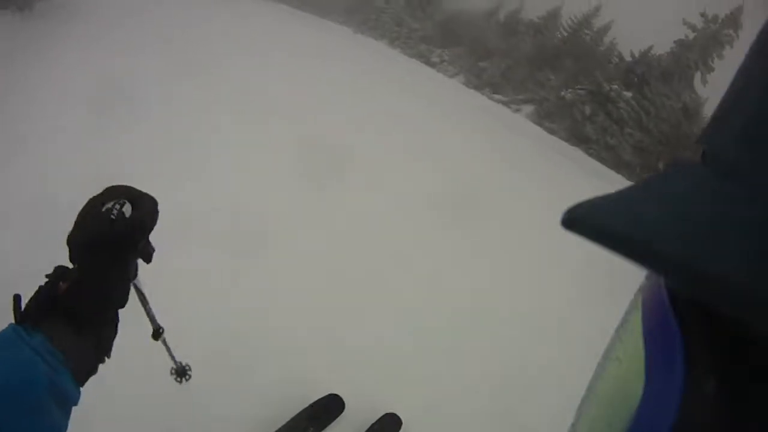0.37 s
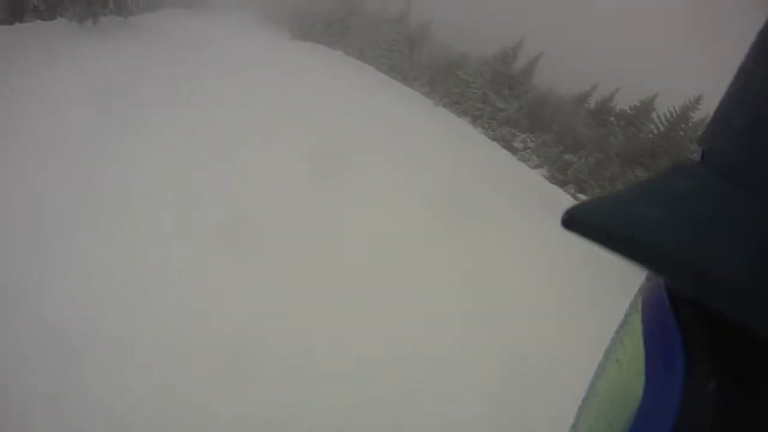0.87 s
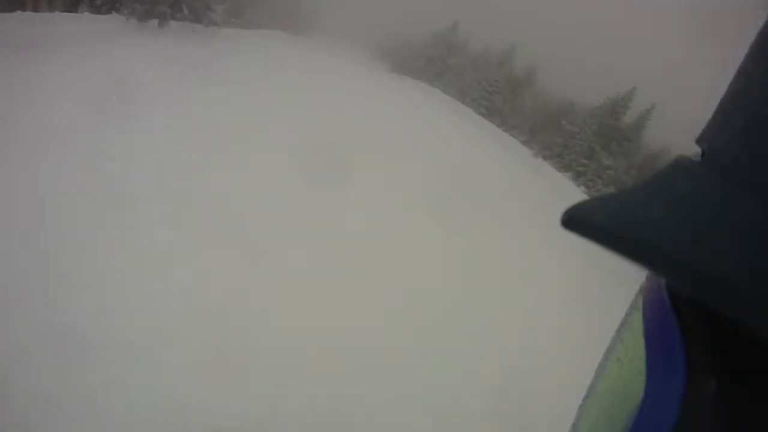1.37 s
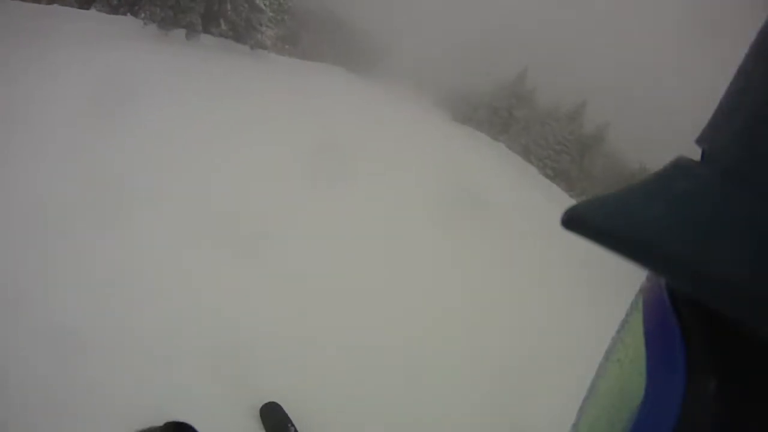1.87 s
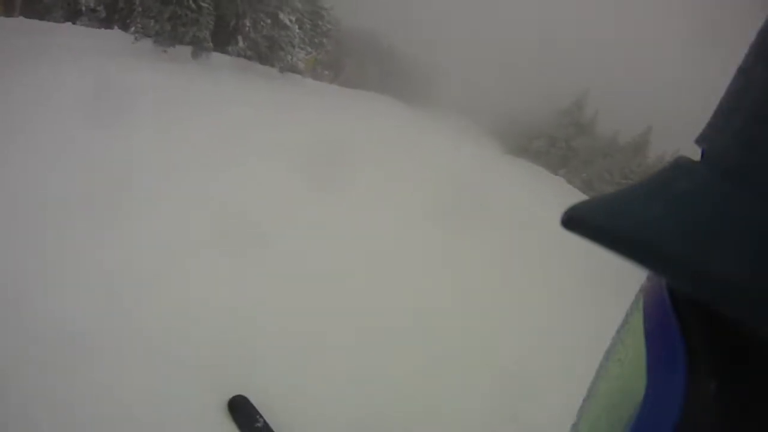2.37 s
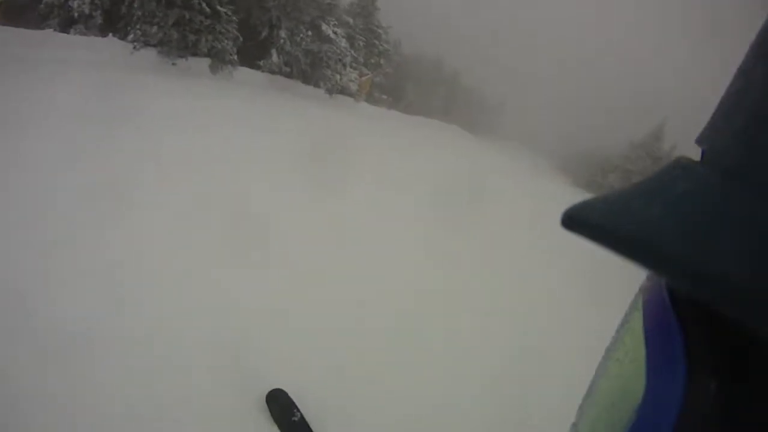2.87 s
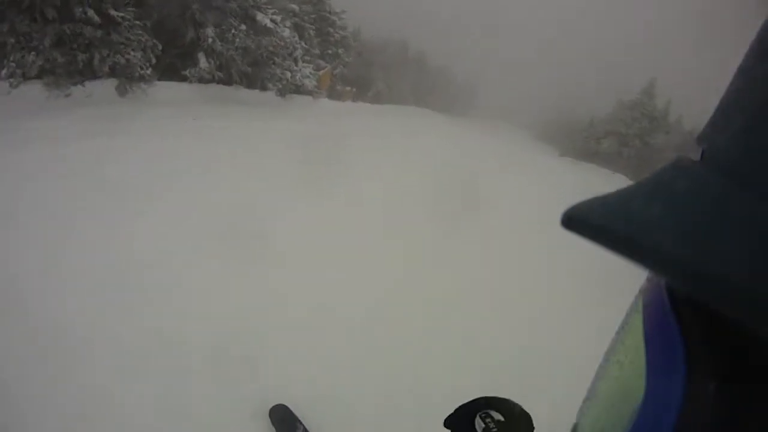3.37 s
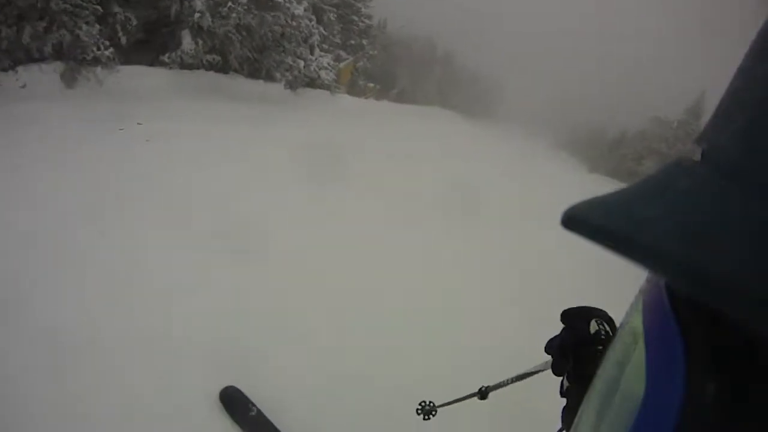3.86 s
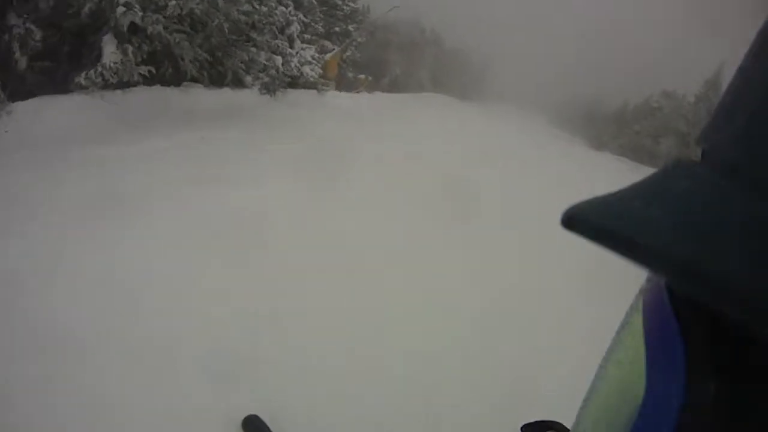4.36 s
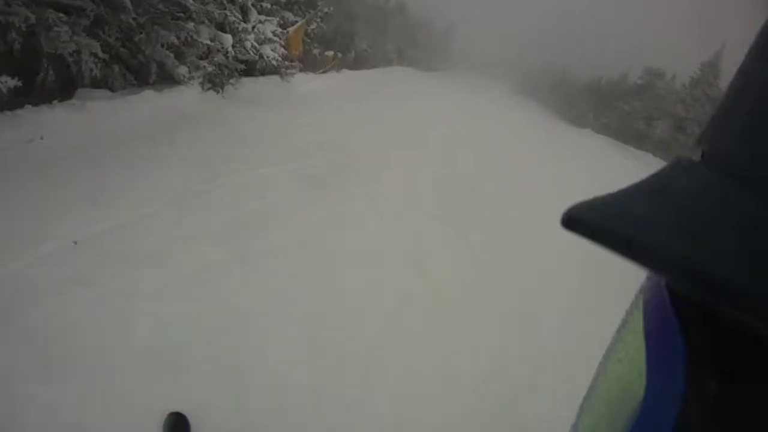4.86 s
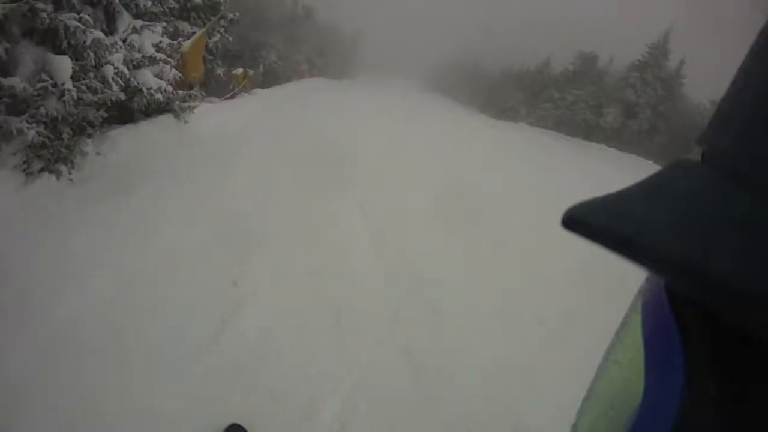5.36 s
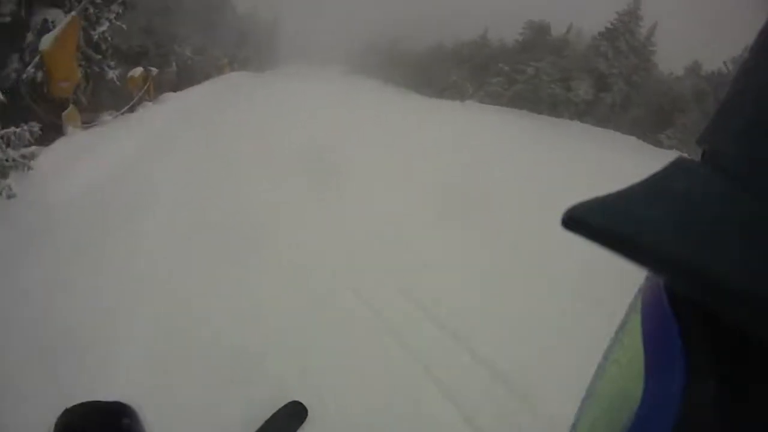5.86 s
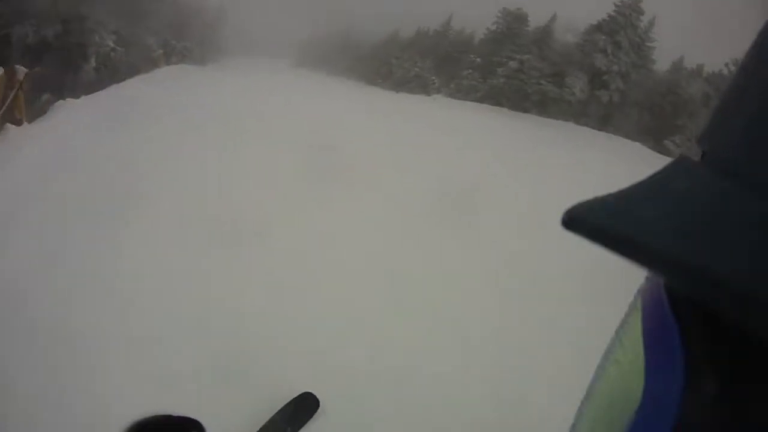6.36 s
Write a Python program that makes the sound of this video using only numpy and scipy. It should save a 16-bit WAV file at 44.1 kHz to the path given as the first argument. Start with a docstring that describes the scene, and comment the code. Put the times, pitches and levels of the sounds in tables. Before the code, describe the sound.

Close and muffled on an open snowy slope: low wind rumble and sliding skis start moderate and sink to a faint hush. A swish rises, snow crunches briefly with a tiny edge squeal, and wind flutters now and then. Another swish swells and fades, light icy ticks gather, then dense crunching leads into strong scraping, powder hiss and windy thuds. Brief dropouts pop occasionally.

```python
"""Skis slide over soft snow, heard by a helmet microphone in a sealed case: shaped noise swishes, scrapes and sprays,
while decaying noise bursts make the crunches and ticks, and a narrow noise band the squeal of an edge.
Head wind buffets the microphone: low noise with random swells thuds and flutters, rising in gusts.
At listed moments the sound cuts out for some milliseconds, with a downward pop at each end."""
import sys
import numpy as np
from scipy import signal
from scipy.fft import rfft, irfft, next_fast_len
from scipy.io import wavfile
from scipy.ndimage import uniform_filter1d, map_coordinates

SR = 44100
rng = np.random.default_rng(int(sys.argv[2]) if len(sys.argv) > 2 else 0)


def attenuation_scalar(level_db):
    """Turn a level in dB into a linear amplitude multiplier (20 dB per decade)."""
    decades = np.asarray(level_db, float) / 20
    return 10 ** decades


def put_to_file(sound):
    """Save the sound as 16-bit audio at rate SR, in the file named by the first command-line argument."""
    columns = np.atleast_2d(sound).T  # one column per channel
    safe = np.clip(columns, -1, 1)
    whole_steps = np.round(safe * 32767)
    wavfile.write(sys.argv[1], SR, whole_steps.astype(np.int16))


N = 285768

# Head wind, its strength given as the level of the deep buffet outside gusts: time_s, buffet_db
WIND_STRENGTH = [(0, -39.5), (.35, -50), (.58, -52.5), (.82, -53.5), (.89, -65), (.96, -57), (1.3, -69.5),
                 (1.78, -62.5), (2.1, -70), (2.6, -74), (2.92, -53.5), (3.3, -54.5), (3.7, -56.5),
                 (4.3, -71), (4.6, -63), (5.3, -60.5), (5.75, -51), (6.15, -49), (6.48, -44)]
# Gusts on the microphone port: start_s, length_s, flutter_db, buffet_over_flutter_db
PORT_GUSTS = [(0.612, 0.069, -37, -31), (1.036, 0.2, -51.5, 3.5), (2.97, .05, -50, -5),
              (3.441, 0.071, -43, 6.5), (3.58, 0.1, -52, -3), (4.54, 0.049, -55.5, -5),
              (5.363, 0.065, -59, -15), (5.698, 0.046, -37.5, -11), (5.891, 0.14, -34, -7.5),
              (6.235, 0.11, -29.5, -16)]
# Relative spectra of the wind's large and small eddies: frequency_hz, density_db_per_hz
BUFFET_SPECTRUM = [(12, -44.5), (25, -14), (45, -7.5), (75, -7), (120, -10), (400, -73), (4000, -120)]
FLUTTER_SPECTRUM = [(30, -57.5), (80, -7.5), (130, 0), (210, 0), (350, -9.5), (700, -19), (4000, -120)]
# Edge pressure through the turns, before bites: time_s, scrape_db, slide_over_scrape_db
EDGE_PRESSURE = [(0, -48, 5.5), (.3, -49.5, 4.5), (.6, -60, 6), (.74, -71.5, 4.5), (1.19, -61, 6.5),
                 (1.35, -68.5, 6.5), (1.64, -56.5, 7.5), (2, -53.5, 9.5), (2.29, -56.5, 16),
                 (2.42, -58.5, 15), (2.67, -53.5, 9), (3.05, -51.5, 4.5), (3.4, -53, 7.5), (3.88, -45, 4.5),
                 (4.15, -52.5, 9.5), (4.24, -57, 4), (4.52, -58.5, 4.5), (4.9, -54.5, 6), (5.31, -52, 9.5),
                 (5.52, -46, 10.5), (5.72, -38.5, 6.5), (5.97, -34.5, 5.5), (6.14, -44, 10),
                 (6.32, -39.5, 6.5), (6.48, -40, 2.5)]
# Edges biting into harder snow for a moment: start_s, length_s, scrape_gain_db
EDGE_BITES = [(2.46, 0.11, 8.5), (2.874, 0.012, 13), (2.924, 0.011, 7), (2.97, 0.04, 4), (3.483, 0.15, 3.5),
              (4.56, .025, 10.5), (4.613, 0.059, 5), (5.333, 0.036, 9), (5.375, 0.041, 15),
              (5.423, 0.061, 6), (5.633, 0.036, 1.5), (5.907, 0.012, 1.5), (5.99, 0.018, 5)]
# Powder spray at a light scrape: time_s, spray_db
LIGHT_SPRAY = [(0, -69), (.8, -71.5), (2.3, -67.5), (2.8, -67), (4, -68.5), (4.6, -66), (5.2, -65.5),
               (5.5, -67), (5.8, -67.5), (6.48, -68.5)]
# Relative spectra of bases, edges and powder: frequency_hz, density_db_per_hz
SLIDE_SPECTRUM = [(60, -52.5), (150, -12.5), (300, 0), (450, 0), (700, -2), (1000, -8), (1600, -23.5),
                  (4000, -120)]
SCRAPE_SPECTRUM = [(500, -38), (900, -2.5), (1300, -1.5), (1900, -4), (2300, -10), (3000, -26.5),
                   (3600, -41), (6000, -120)]
SPRAY_SPECTRUM = [(2000, -1), (3200, 0.1), (4300, -0.6), (5400, -0.6), (6000, -7.5), (7000, -6.5),
                  (9200, -2.5), (11500, -8), (13000, -19.1), (15000, -21), (17000, -83)]
# Moments when the sound cuts out: start_s, length_ms, pop_in_db, pop_out_db (scales of the pop shapes)
SOUND_CUTS = [(.0587, 2.1, -27, -40), (.6301, 4.8, -26, -24), (.6675, 5.2, -26, -29),
              (.6761, 4.9, -30, -25), (.9605, 3.1, -44, -55), (.9833, 11, -40, -37),
              (3.4692, 21.9, -32, -25), (3.5212, 9.3, -55, -50), (3.6133, 19.9, -27, -28),
              (4.814, 14, -43, -38), (6.2525, 4, -25, -24), (6.2612, 1.8, -40, -21), (6.277, 4.5, -23, -26)]
# Crusts breaking under the skis: start_s, knock_peak_db, pitch_hz, crackle_over_knock_db
CRUST_BREAKS = [(0.06, -26.5, 710, -15), (0.223, -35, 535, -7.5), (0.788, -38.5, 630, -26),
                (0.929, -42, 450, -20), (0.98, -43, 480, -7), (1.055, -41, 506, -20),
                (1.324, -40.5, 430, -19), (1.543, -43.5, 676, -23), (1.578, -42.5, 680, -22),
                (2.044, -41, 810, -22), (2.266, -44.5, 450, -24), (2.381, -39.5, 430, -3),
                (2.43, -25.5, 700, -12.5), (2.482, -30.5, 604, -25), (2.854, -42, 704, -12),
                (2.882, -35, 860, -6), (2.931, -34, 465, -18), (3.394, -41, 764, -19),
                (4.629, -33, 774, -12), (4.64, -32, 685, -0.5), (4.836, -35, 504, -12),
                (4.965, -38, 690, -9), (5.193, -33, 445, -20), (5.339, -29, 590, -17),
                (5.398, -18, 430, -22), (5.434, -21, 506, -16), (5.495, -23.5, 780, -18),
                (5.592, -24, 544, -13), (5.65, -19.5, 500, -10), (5.721, -28, 495, -4),
                (5.748, -21.5, 606, -7.5), (5.836, -23, 690, -10), (5.915, -20.5, 720, -9.5),
                (6.398, -30, 720, -8)]
# Ice and buckle ticks: start_s, level_db, pitch_hz
HARD_TICKS = [(0.448, -59, 6400), (.53, -60, 5100), (.862, -62, 2550), (.93, -67, 3600), (0.98, -60, 3100),
              (2.353, -57, 4700), (2.885, -50, 4100), (2.906, -46, 2950), (4.642, -61, 3200),
              (4.804, -52, 4400), (4.904, -53, 9100), (4.964, -52, 6100), (5.036, -47, 10300),
              (5.064, -53, 9100), (5.125, -47, 8100), (5.26, -54, 7400), (5.292, -57, 3800),
              (5.381, -55, 7700), (5.397, -41, 4400), (5.549, -47, 3800), (5.568, -39, 3700),
              (4.868, -47, 2700), (5.085, -54, 5500), (5.651, -37, 3300), (5.653, -42, 9300),
              (5.727, -39, 10600), (6.152, -43, 5500)]
# Ticks that ring on with a pitch: start_s, level_db, pitch_hz
RINGING_TICKS = [(5.657, -45, 8050)]
# An edge squeals, one row (level before its unsteadiness): start_s, length_s, level_db
EDGE_SQUEAL = (2.478, .095, -69)
# Relative spectrum of the squeal: frequency_hz, density_db_per_hz
SQUEAL_SPECTRUM = [(3500, -56), (4700, -14), (5150, -4), (5500, -8), (6500, -62)]

BITE_RISE_S, BITE_FALL_S = 0.0084, 0.01  # the fall is a time constant


def unit(x):
    """Normalisation: equal mean power, rms 1."""
    return x / np.sqrt(np.mean(x ** 2) + 1e-20)


def curves(rows):
    """Linear interpolation: one value per sample for each column after the time."""
    times, *columns = np.transpose(rows)
    return [np.interp(np.arange(N) / SR, times, column) for column in columns]


def wobble(rate_hz):
    """Slow random modulation: a smooth curve through rate_hz random knots a second."""
    knots = rng.standard_normal(400 * 7)
    return map_coordinates(knots, [np.arange(N) * rate_hz / SR])


def coloured(x, spectrum):
    """Minimum-phase filtering: a folded cepstrum makes the spectrum's filter causal; rms 1."""
    m = 2 * next_fast_len(N // 2 + 4096)
    hz, db = np.transpose(spectrum)
    log_hz = np.log(np.fft.rfftfreq(m, 1 / SR) + 1)
    magnitude = attenuation_scalar(np.interp(log_hz, np.log(hz), db))
    cepstrum = irfft(np.log(magnitude), m)
    cepstrum[1:m // 2] *= 2
    cepstrum[m // 2 + 1:] = 0
    response = np.exp(rfft(cepstrum))
    return unit(irfft(rfft(x, m) * response, m)[:N])


def patchy(spread_db):
    """Non-stationary noise: white noise with random gains in patches of time and frequency."""
    cells = signal.stft(rng.standard_normal(N), nperseg=512)[2]
    field = uniform_filter1d(rng.standard_normal(cells.shape), size=5, axis=0)
    field = uniform_filter1d(field, size=7, axis=1)
    return unit(signal.istft(cells * attenuation_scalar(spread_db * unit(field)), nperseg=512)[1][:N])


def held(start_s, length_s, rise_s, fall_s):
    """Forcing and relaxation: a squared rise to 1, a hold until length_s, an exponential fall."""
    t = np.arange(N) / SR - start_s
    rise = np.clip(t / rise_s, 0, 1) ** 2
    return rise * np.exp(-np.clip(t - length_s, 0, None) / fall_s)


def wind():
    """Turbulent pressure: eddies reach the port in lumps, large slow ones thud, small quick ones flutter."""
    calm_db, flutter_over_buffet_db = -52.5, 0.5  # at the calm strength
    flutter_growth = 0.7  # dB of flutter per dB of wind
    buffet_db, = curves(WIND_STRENGTH)
    flutter_db = calm_db + flutter_over_buffet_db + flutter_growth * (buffet_db - calm_db)
    buffet_gain, flutter_gain = attenuation_scalar(buffet_db), attenuation_scalar(flutter_db)
    for start_s, length_s, gust_db, deep_db in PORT_GUSTS:
        gust = held(start_s, length_s, rise_s=0.01, fall_s=0.025)
        buffet_gain += gust * attenuation_scalar(gust_db + deep_db)
        flutter_gain += gust * attenuation_scalar(gust_db)
    lumps = 1.6 * wobble(22)  # shared by both eddy sizes
    buffet = coloured(patchy(spread_db=1.1), BUFFET_SPECTRUM) * attenuation_scalar(lumps)
    flutter = coloured(patchy(spread_db=1.5), FLUTTER_SPECTRUM) * attenuation_scalar(1.4 * lumps + 0.35 * wobble(45))
    return buffet_gain * unit(buffet) + flutter_gain * unit(flutter)


def grains(per_second, spread_db):
    """Shot noise: snow crystals snap at random moments with exponentially spread extra level."""
    snaps = rng.random(N) < per_second / SR
    sizes = attenuation_scalar(spread_db * rng.exponential(1, N))
    return unit(snaps * rng.standard_normal(N) * sizes)


def glide():
    """Friction noise: bases slide, edges scrape, powder sprays; bumps in the snow shake all three together."""
    slide_share, spray_share = 0.63, 0.34  # shares of a bite's dB gain
    light_db, spray_growth = -53.5, 0.71  # a light scrape; dB of spray per dB of pressure
    pressure_db, slide_over_db = curves(EDGE_PRESSURE)
    light_spray_db, = curves(LIGHT_SPRAY)
    bite_db = sum(db * held(s, length, BITE_RISE_S, BITE_FALL_S) for s, length, db in EDGE_BITES)
    scrape_db = pressure_db + bite_db
    slide_db = pressure_db + slide_over_db + slide_share * bite_db
    spray_db = light_spray_db + spray_growth * (pressure_db - light_db) + spray_share * bite_db
    bumps = 0.3 * wobble(21.8) + 1.2 * wobble(60)
    snaps = grains(per_second=1500, spread_db=1.6)
    slide = coloured(patchy(spread_db=0.5) + 0.56 * snaps, SLIDE_SPECTRUM)
    slide = slide * attenuation_scalar(bumps + 2.6 * wobble(12))
    scrape = coloured(patchy(spread_db=1.75) + 0.6 * snaps, SCRAPE_SPECTRUM)
    scrape = scrape * attenuation_scalar(1.4 * bumps + 0.29 * wobble(30))
    spray = coloured(patchy(spread_db=1.5) + 0.5 * snaps, SPRAY_SPECTRUM)
    spray = spray * attenuation_scalar(1.14 * bumps + 0.17 * wobble(13.0))
    return attenuation_scalar(slide_db) * unit(slide) + attenuation_scalar(scrape_db) * unit(scrape) + attenuation_scalar(spray_db) * unit(spray)


def hump(t, peak_s):
    """Critically damped impulse: a soft push that peaks at peak_s and fades; height 1."""
    return t / peak_s * np.exp(1 - t / peak_s)


def cut_out(dry):
    """Gating transients: during a cut nothing of the scene passes; each end is heard as a downward pop."""
    passing, pops = np.ones(N), np.zeros(N + SR)
    t = np.arange(SR // 50) / SR
    pop = -hump(t, 0.00055) * (1 - np.exp(-t / 0.0001))
    climb = 0.37 * hump(t + 0.00045, 0.00049)[::-1]  # the pressure climbs just before
    swell = 0.42 * hump(t, 0.0017) ** 2  # the pressure rebounds after the cut
    for start_s, length_ms, in_db, out_db in SOUND_CUTS:
        start, end = round(start_s * SR), round((start_s + length_ms / 1000) * SR)
        passing[start:end] = 0
        pops[start - len(t):start] += attenuation_scalar(in_db) * climb
        pops[start:][:len(t)] += attenuation_scalar(in_db) * pop
        pops[end:][:len(t)] += attenuation_scalar(out_db) * (0.91 * pop + swell)
    passing = uniform_filter1d(passing, size=21)  # softens the gate's edges
    return dry * passing + uniform_filter1d(pops[:N], size=5)


def burst(hz, width, t60, rise, noise):
    """Damped band noise: a band around hz (width as a ratio) starts fast and dies, times in s; peak 1."""
    edges = np.clip([hz / (1 + width), hz * (1 + width)], 50, SR / 2.2)
    bandpass = signal.butter(3, edges, "bandpass", fs=SR, output="sos")
    band = signal.sosfilt(bandpass, noise)[400:]  # skips the filter's own build-up
    t = np.arange(len(band)) / SR
    puff = band * (1 - np.exp(-t / rise)) * attenuation_scalar(-60 * t / t60)
    return puff / np.abs(puff).max()


def crunches():
    """Brittle fracture: each break knocks the case near its own pitch and sheds a broader crackle."""
    out = np.zeros(N + SR)
    for start_s, db, hz, crackle_db in CRUST_BREAKS:
        noise = rng.standard_normal((2, SR // 8))
        knock = burst(hz, width=0.27, t60=0.041, rise=0.00053, noise=noise[0])
        crackle = burst(1650, width=0.55, t60=0.03, rise=0.0008, noise=noise[1])
        sound = knock + attenuation_scalar(crackle_db) * crackle
        out[round(start_s * SR):][:len(sound)] += attenuation_scalar(db) * sound
    return out[:N]


def ticks():
    """Impact of thin hard bodies: a quick spit of treble, in some a narrow ring as well."""
    out = np.zeros(N + SR)
    for ring_gain, rows in ((0, HARD_TICKS), (1, RINGING_TICKS)):
        for start_s, db, hz in rows:
            noise = rng.standard_normal((2, SR // 8))
            ring = burst(hz, width=0.06, t60=0.048, rise=0.00086, noise=noise[0])
            spit = burst(hz, width=0.59, t60=0.0085, rise=0.00013, noise=noise[1])
            sound = ring_gain * ring + 0.88 * spit
            out[round(start_s * SR):][:len(sound)] += attenuation_scalar(db) * sound
    return out[:N]


def squeal():
    """Narrow-band friction: an unsteady band of noise while one edge grinds."""
    start_s, length_s, db = EDGE_SQUEAL
    band = coloured(rng.standard_normal(N), SQUEAL_SPECTRUM) * attenuation_scalar(2.4 * wobble(50))
    return attenuation_scalar(db) * held(start_s, length_s, BITE_RISE_S, BITE_FALL_S) * band


def scene():
    """Superposition: the pressures of all sources add at one microphone."""
    return (wind() + glide() + crunches() + ticks() + squeal())[None]


def low_pass(x):
    """Removes everything above the highest recorded frequency."""
    return signal.sosfilt(signal.butter(12, 15138, fs=SR, output="sos"), x)


def record(dry):
    """Signal chain: the cuts and their pops act on the summed sound."""
    mix = cut_out(dry)
    return low_pass(mix)


dry = scene()
out = record(dry)
put_to_file(out)
```